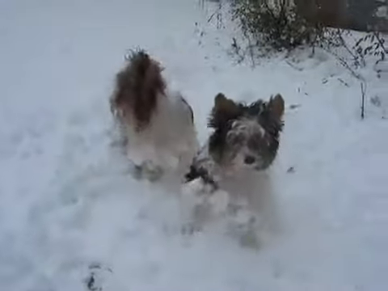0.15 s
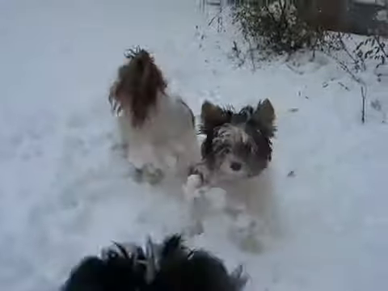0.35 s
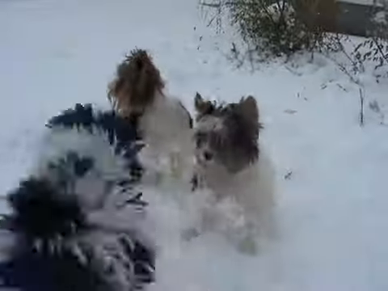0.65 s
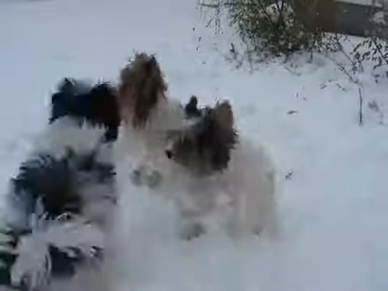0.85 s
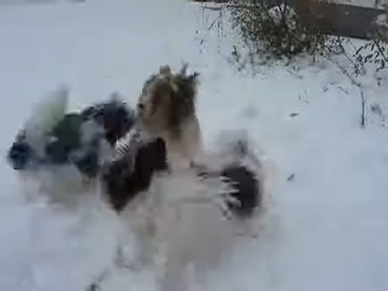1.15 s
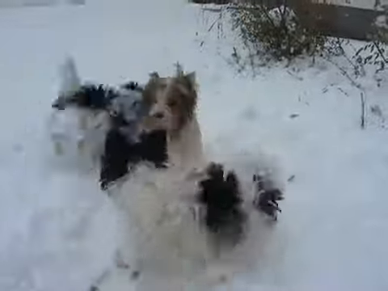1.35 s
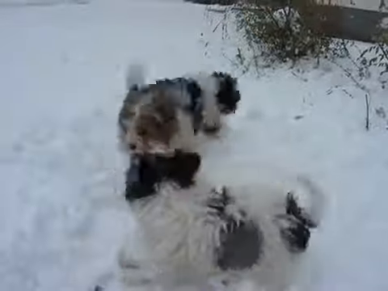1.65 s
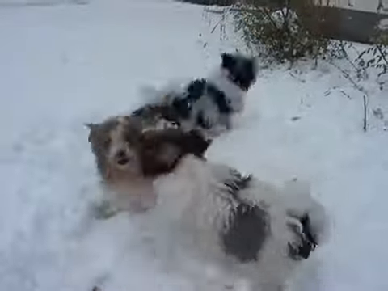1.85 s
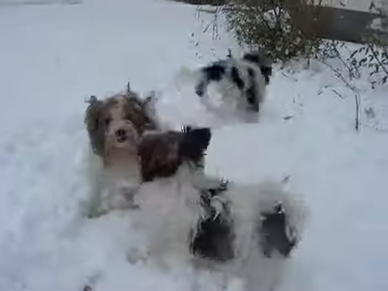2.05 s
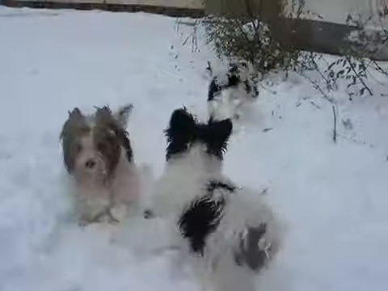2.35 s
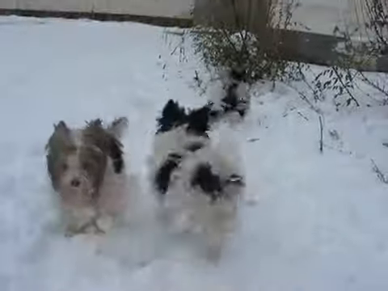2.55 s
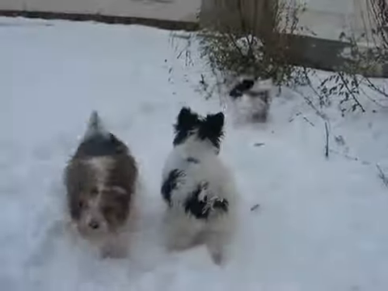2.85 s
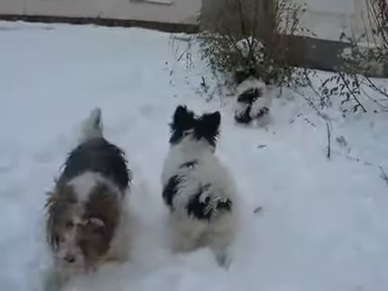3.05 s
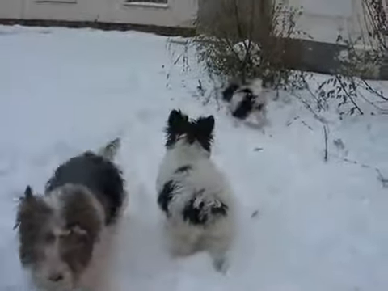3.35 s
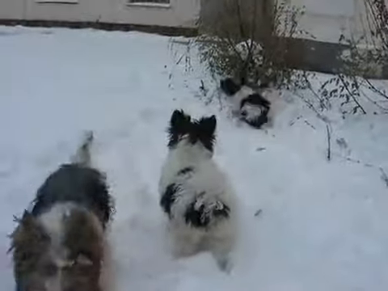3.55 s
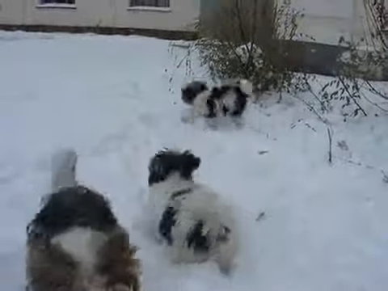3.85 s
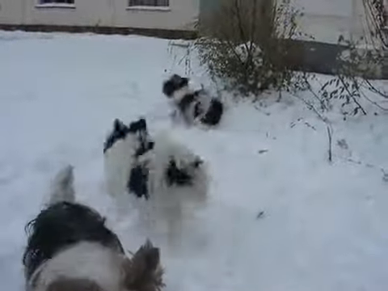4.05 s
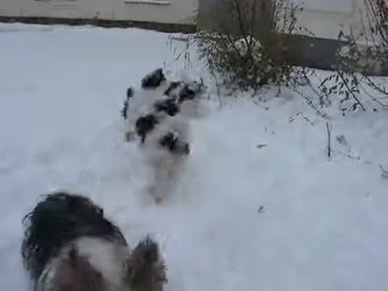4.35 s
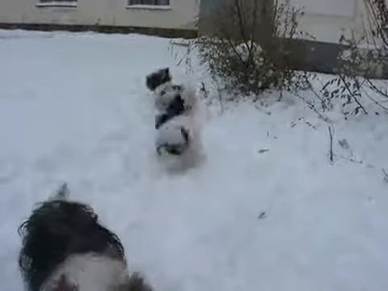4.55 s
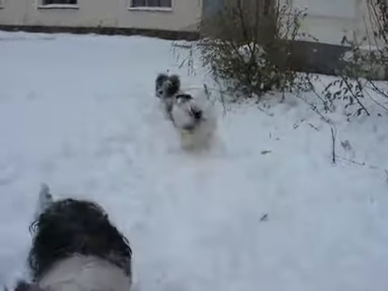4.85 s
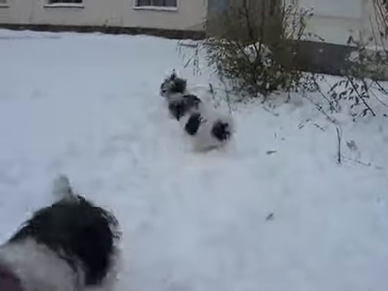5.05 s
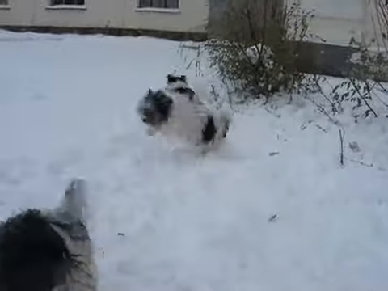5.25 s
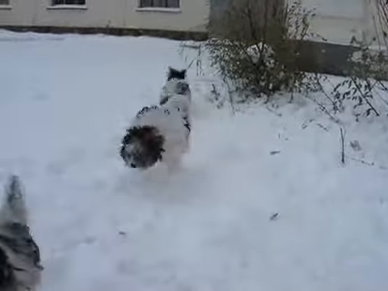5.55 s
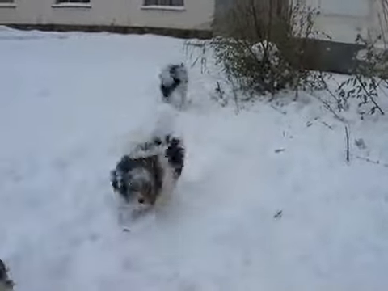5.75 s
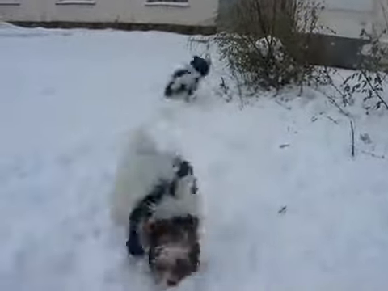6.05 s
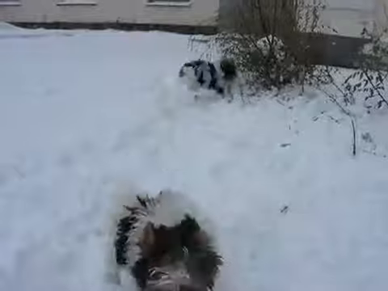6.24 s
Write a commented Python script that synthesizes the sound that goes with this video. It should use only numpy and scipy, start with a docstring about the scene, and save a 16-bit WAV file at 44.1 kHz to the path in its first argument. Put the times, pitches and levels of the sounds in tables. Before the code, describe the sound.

Small puppies whimper softly and give three short high yips, with paws thudding in snow over a steady outdoor hiss.

```python
"""Paws thud and scuff in snow over an outdoor hiss; then small puppies whimper softly and yip three times.
Each call is a harmonic series from the vocal folds, shaped by the resonances of the mouth; irregular
vibration makes it hoarse. The calls return faintly from the house walls around the yard.
A pocket camera with a low sample rate hears it; its gain control ducks after loud yips and creeps back."""
import sys
import numpy as np
from scipy import signal
from scipy.fft import rfft, irfft, next_fast_len
from scipy.io import wavfile
from scipy.ndimage import uniform_filter1d

SR = 44100
rng = np.random.default_rng(int(sys.argv[2]) if len(sys.argv) > 2 else 0)


def store_pcm(level_fs):
    """Save levels as 16-bit WAV."""
    pcm = np.round(np.clip(level_fs, -1, 1) * 32767).astype(np.int16)
    wavfile.write(sys.argv[1], SR, np.atleast_2d(pcm).T)


N = 282725
TIME = np.arange(N) / SR

# spectrum of the outdoor hiss: frequency_hz, relative_density_db
HISS_SPECTRUM = [(24, -50), (40, 17), (43, -25), (91, -14), (268, -13), (364, -7.5), (417, -9.5),
                 (545, -4.5), (770, -6.5), (881, -3), (1200, -8.5), (1270, -10.5), (1940, -14.5),
                 (3440, -19.5), (3940, -24.5), (5120, -56), (8670, -120)]
# a distant rush that swells and sinks: time_s, level_db
RUSH_ENVELOPE = [(0, -55.5), (1.4, -51), (3.3, -57), (4.1, -48), (4.45, -41.5), (4.7, -45.5), (4.9, -54.5),
                 (5.4, -52), (5.9, -47.5), (6.4, -50)]
# spectrum of that rush: frequency_hz, relative_density_db
RUSH_SPECTRUM = [(250, -21.5), (550, -16), (850, -8), (1100, -14), (1800, -36)]
# snow scuffed up: middle_s, level_db, length_s, centre_hz, width_octaves
SNOW_SCUFFS = [(0.19, -53, 0.16, 2780, 0.33), (0.703, -45.5, 0.094, 776, 2.9),
               (1.009, -36, 0.017, 1840, 0.58), (1.007, -33, 0.02, 740, 1.8), (2.65, -53, 0.25, 2800, 0.23),
               (5.891, -46, 0.084, 1993, 1.1), (6.307, -49.5, 0.31, 2740, 0.38)]
# paws landing in snow: start_s, peak_db, centre_hz, t60_s
PAW_IMPACTS = [(.208, -24, 363, 0.052), (0.259, -29, 597, 0.063), (0.388, -23.5, 513, 0.043),
               (0.591, -21, 370, 0.028), (.672, -31, 423, 0.085), (1.194, -32.5, 103, 0.069),
               (1.211, -33, 115, 0.026), (5.686, -30, 496, 0.051), (6.100, -22, 660, 0.022),
               (6.274, -25.5, 436, 0.041)]
# frequency response of the yard's echo: frequency_hz, gain_db
YARD_RESPONSE = [(500, -8.5), (1250, -2.5), (2000, 1), (2500, -3), (3200, 6.5), (4000, -3)]
# vocal tract with the mouth nearly shut: frequency_hz, gain_db
SHUT_TRACT = [(250, -15.5), (460, -1), (750, 0), (1050, -0.5), (1450, -12), (1800, -6.5), (2200, -4.5),
              (2800, -13.5), (3500, -10.5), (5000, -19.5)]
# vocal tract with the mouth wide open: frequency_hz, gain_db
OPEN_TRACT = [(450, -53.5), (650, -18.5), (820, 2), (1050, 3.5), (1300, 3), (1600, 3.5), (1900, 3),
              (2300, 5), (2700, -1.5), (3000, -8.5), (3500, -4.5), (4200, -24.5), (5500, -65.5)]
# faint whines: start_s, length_s, pitch_hz, level_db
WHINE_NOTES = [(3.518, .11, 891, -45.5), (5.69, 0.0766, 860, -39.5)]
# one contour per whimper: time_s, pitch_hz, level_db
WHIMPER_CONTOURS = [
    [(1.540, 842, -36), (1.549, 781, -28), (1.560, 690, -26.5), (1.568, 842, -24), (1.578, 589, -35),
     (1.614, 568, -40), (1.621, 686, -25.5), (1.632, 763, -23.5), (1.648, 636, -37), (1.665, 735, -31)],
    [(2.535, 693, -32.5), (2.544, 748, -23), (2.548, 940, -19.5), (2.560, 989, -20.5), (2.569, 1052, -27)],
    [(2.750, 908, -22), (2.778, 902, -24), (2.795, 842, -19.5), (2.810, 733, -19.5), (2.824, 696, -28),
     (2.829, 469, -29.5), (2.862, 481, -31.5)],
]
# one timbre per whimper; tilt is the slope of the harmonic series:
# first_tilt_db_per_octave, middle_tilt_db_per_octave, last_tilt_db_per_octave, roughness, treble_db
WHIMPER_TIMBRES = [(4, -3, -9, 0.2, -23), (7, -6, -22, 0.16, -16), (-12.5, -3.5, -4, 0.18, 5.5)]
# stretches where a yip may turn hoarse: start_s, end_s, final_added_roughness
VOICE_CRACKS = [(1.889, 1.974, 0.84), (1.979, 1.987, 0.6), (3.984, 4.07, 0), (5.02, 5.045, 0.75),
                (5.041, 5.079, 1.26), (5.087, 5.104, 1.2)]
# one arch per yip, the first breaking upward twice: time_s, pitch_hz
YIP_CONTOURS = [
    [(1.874, 917.5), (1.895, 1109), (1.918, 1253), (1.932, 1210), (1.936, 1532), (1.950, 1095),
     (1.953, 1718), (1.966, 1303), (1.993, 1159), (2.020, 980)],
    [(3.928, 1070), (3.942, 1325), (3.956, 1403), (3.966, 1360), (3.974, 1230), (3.982, 964), (4.000, 961),
     (4.035, 906), (4.070, 924)],
    [(4.995, 872.6), (5.012, 1174), (5.030, 1249), (5.046, 1264), (5.055, 1171), (5.079, 1060),
     (5.087, 845), (5.110, 804)],
]
# loud yips: start_s, attack_s, hold_s, release_s, level_db,
# first_tilt_db_per_octave, last_tilt_db_per_octave, echo_send_db, treble_db
YIP_NOTES = [(1.871, 0.017, 0.1, 0.036, -3.5, 3.5, -14, -22.5, -0.5),
             (3.926, 0.021, 0.067, 0.061, -11, 3, -10.5, -26.5, 15),
             (4.994, 0.019, 0.072, 0.026, -8.5, -7, -0.5, -19, 0)]


def from_db(db):
    """Decibel law: amplitude grows tenfold every 20 dB."""
    return 10 ** (np.asarray(db) / 20)


def unit_rms(x):
    """Normalisation to a mean square of one."""
    return x / np.sqrt(np.mean(x ** 2) + 1e-20)


def butterworth(x, order, hz, kind="low"):
    """Causal filtering with a maximally flat passband."""
    return signal.sosfilt(signal.butter(order, hz, kind, fs=SR, output="sos"), x)


def coloured(x, spectrum):
    """Spectral shaping by a (frequency_hz, gain_db) curve, falling 20 dB per octave past its ends."""
    hz, db = np.transpose(spectrum)
    size = next_fast_len(len(x) + 2048)
    octave = np.log2(np.maximum(np.arange(size // 2 + 1) * SR / size, 1))
    beyond = np.abs(octave - np.clip(octave, np.log2(hz[0]), np.log2(hz[-1])))
    gain = from_db(np.interp(octave, np.log2(hz), db) - 20 * beyond)
    return irfft(rfft(x, size) * gain, size)[:len(x)]


def noise(spectrum, size=N):
    """Filtered white noise takes on the filter's spectrum; unit power."""
    return unit_rms(coloured(rng.standard_normal(size), spectrum))


def wobble(rate_hz, size):
    """Random modulation: low-passed noise of unit power."""
    return unit_rms(butterworth(rng.standard_normal(size + 4096), 2, rate_hz)[4096:])


def running_power(x, size):
    """Short-time mean square under a triangular window."""
    return np.maximum(uniform_filter1d(uniform_filter1d(x ** 2, size), size), 1e-12)


def lagged(x, time_constant_s):
    """Exponential relaxation through a one-pole filter."""
    pole = np.exp(-1 / (time_constant_s * SR))
    return signal.lfilter([1 - pole], [1, -pole], x)


def during(start_s, end_s):
    """The sampling instants of an interval."""
    return TIME[(TIME >= start_s) & (TIME < end_s)]


def outdoor_air(hiss_db=-41, flutter_db=1.0):
    """Amplitude-modulated noise: a nearly even hiss with a far rush swelling inside it."""
    hiss = from_db(hiss_db + flutter_db * wobble(14, N)) * noise(HISS_SPECTRUM)
    rush = from_db(np.interp(TIME, *np.transpose(RUSH_ENVELOPE))) * noise(RUSH_SPECTRUM)
    return hiss + rush


def scuffs(grain_db=3.0):
    """Granular friction: loose snow brushed aside gives short puffs of band-limited noise."""
    out = np.zeros(N)
    grains = rng.standard_normal(N) * from_db(grain_db * wobble(200, N))
    for middle_s, level_db, length_s, centre_hz, octaves in SNOW_SCUFFS:
        band_hz = centre_hz * 2 ** (np.array([-.5, .5]) * octaves)
        stroke = np.exp(-np.minimum(2 * np.abs(TIME - middle_s) / length_s, 2) ** 6)
        out += from_db(level_db) * stroke * unit_rms(butterworth(grains, 2, band_hz, "band"))
    return out


def paws():
    """Inelastic impact: each landing packs the snow in a dull, heavily damped burst."""
    out, t = np.zeros(N + SR), TIME[:SR // 8]
    for start_s, peak_db, centre_hz, t60_s in PAW_IMPACTS:
        crush = rng.standard_normal(len(t)) * from_db(-60 * t / t60_s)
        crush[0] += 12   # the first contact
        thud = butterworth(crush, 2, [centre_hz / 2, centre_hz * 2], "band")
        at = int(start_s * SR)
        out[at:at + len(t)] += from_db(peak_db) * thud / np.abs(thud).max()
    return out[:N]


def yard_echo(x, build_s=0.022, t60_s=2.2, farthest_s=.9, wall_delay_s=0.31, wall_spread_s=0.019,
              wall_db=-8.5, ring_hz=1279, ring_width_hz=60, ring_db=0.5):
    """Reverberation by convolution: snow absorbs the near reflections; one wall's thin echo stands out."""
    t = TIME[:SR + SR // 5]
    scatter = rng.standard_normal(len(t))
    wash = scatter * np.minimum(t / build_s, 1) * from_db(-60 * t / t60_s) * (t < farthest_s)
    wall = butterworth(scatter[::-1], 2, 1700, "high")
    wall *= np.exp(-((t - wall_delay_s) / wall_spread_s) ** 2)
    echoes = (unit_rms(wash) + from_db(wall_db) * unit_rms(wall)) / np.sqrt(len(t))
    ring = signal.lfilter(*signal.iirpeak(ring_hz, ring_hz / ring_width_hz, fs=SR), echoes)
    impulse_response = echoes + from_db(ring_db) * ring   # the echo rings on near one pitch
    return coloured(signal.fftconvolve(x, impulse_response)[:N], YARD_RESPONSE)


def vocal_folds(pitch_hz, tilt, rough, size, rattle_hz=450, hoarse_loss_db=7.5):
    """A harmonic oscillator; when rough, jitter unsettles it and a second vibration adds sidebands."""
    wavering_hz = pitch_hz * (1 + 0.04 * rough ** 2 * wobble(130, size))
    phase = 2 * np.pi * np.cumsum(wavering_hz) / SR
    rattle = np.sin(2 * np.pi * np.cumsum(rattle_hz * (1 + 0.33 * wobble(48.9, size))) / SR)
    phase += rough * (.45 * wobble(260, size) + .55 * rattle)   # uneven cycle lengths
    folds = np.zeros(size)
    for k in range(1, 6):
        harmonic_db = tilt * np.log2(k) - hoarse_loss_db * rough * max(k - 2, 0)
        folds += from_db(harmonic_db) * np.sin(k * phase + np.pi * k * k / 4)
    shimmer = 0.18 * wobble(400, size)
    return folds * (1 + rough * (0.64 * rattle + shimmer))


def call(t, pitch_hz, level_db, tilt, rough, tract, breath_db=-28, fade_s=0.0014):
    """Source-filter principle: the vocal tract colours both the folds' tone and the breath noise."""
    size = len(t)
    voice = coloured(vocal_folds(pitch_hz, tilt, np.clip(rough, 0, 1.5), size), tract)
    voice /= np.sqrt(running_power(voice, size=90))
    breath = from_db(breath_db) * noise(tract, size)
    gate = np.clip(np.minimum(t - t[0], t[-1] - t) / fade_s, 0, 1)
    out, at = np.zeros(N), np.searchsorted(TIME, t[0])
    out[at:at + size] = (voice + breath) * gate * from_db(level_db)
    return out


def whine(start_s, length_s, pitch_hz, level_db, swell_db=12):
    """Steep spectral tilt leaves a nearly pure tone, which swells and fades on one pitch."""
    t = during(start_s, start_s + length_s)
    envelope_db = level_db + swell_db * (np.sin(np.pi * (t - start_s) / length_s) - 1)
    return call(t, pitch_hz, envelope_db, tilt=-21, rough=.1, tract=SHUT_TRACT)


def whimper(contour, first_tilt, middle_tilt, last_tilt, rough, treble_db, margin_s=.0033):
    """Soft phonation through a nearly shut mouth; directivity dulls it when the puppy faces away."""
    time_s, pitch_hz, level_db = np.transpose(sorted(contour))
    t = during(time_s[0] - margin_s, time_s[-1] + margin_s)
    tilt = np.interp(t, [t[0], t.mean(), t[-1]], [first_tilt, middle_tilt, last_tilt])
    tract = [(hz, db + np.interp(hz, [1500, 2200], [0, treble_db])) for hz, db in SHUT_TRACT]
    return call(t, np.interp(t, time_s, pitch_hz), np.interp(t, time_s, level_db), tilt, rough, tract)


def hoarseness(t, clear_roughness=.04, onset_share=0.637, edge_s=0.0047):
    """Instability of hard-pressed folds: roughness jumps up and grows until the voice catches again."""
    rough = clear_roughness
    for start_s, end_s, final in VOICE_CRACKS:
        inside = np.clip(.5 + np.minimum(t - start_s, end_s - t) / edge_s, 0, 1)
        rough = rough + final * inside * np.interp(t, [start_s, end_s], [onset_share, 1])
    return rough


def yip(start_s, attack_s, hold_s, release_s, level_db, first_tilt, last_tilt, treble_db, contour,
        rise_db=19, sag_db=3, fall_db=14.5):
    """Pressed phonation: one push of air through an open mouth, whose treble beams forward."""
    corners_s = start_s + np.cumsum([0, attack_s, hold_s, release_s])
    t = during(start_s, corners_s[-1])
    effort_db = np.interp(t, corners_s, [-rise_db, 0, -sag_db, -sag_db - fall_db])
    pitch_hz = np.interp(t, *np.transpose(sorted(contour)))
    rough = hoarseness(t)
    tilt = np.linspace(first_tilt, last_tilt, len(t))
    tilt += 7.5 * np.log2(pitch_hz / 1200) + 5.5 * rough   # a higher or hoarser voice is brighter
    tract = [(hz, db + np.interp(hz, [3200, 4100], [0, treble_db])) for hz, db in OPEN_TRACT]
    tremble_db = wobble(70, len(t)) * np.linspace(0, 2, len(t))   # grows as the air runs out
    return call(t, pitch_hz, level_db + effort_db + tremble_db, tilt, rough, tract)


def scene(soft_echo_send_db=-19):
    """Superposition of the puppies' calls, their echoes, their paws and the outdoor air."""
    voices = sum(whimper(contour, *timbre) for contour, timbre in zip(WHIMPER_CONTOURS, WHIMPER_TIMBRES))
    voices += sum(whine(*note) for note in WHINE_NOTES)
    to_walls = from_db(soft_echo_send_db) * voices
    for (*shape, echo_send_db, treble_db), contour in zip(YIP_NOTES, YIP_CONTOURS):
        direct = yip(*shape, treble_db, contour)
        voices += direct
        to_walls += from_db(echo_send_db) * direct
    return (voices + yard_echo(to_walls) + paws() + scuffs() + outdoor_air())[None]


def gain_control(x, limit_db=-10.5, late_s=0.0077, attack_s=0.0002, overshoot=0.57, settle_s=0.019):
    """Compression: past the limit the gain drops late and abruptly, sinks further, then creeps back."""
    excess_db = np.maximum(10 * np.log10(running_power(x, size=60)) - limit_db, 0)
    leak_db = 17 * TIME   # the held peak drains at a steady rate
    held_db = np.maximum.accumulate(excess_db + leak_db) - leak_db
    held_db = np.interp(TIME - late_s, TIME, held_db)
    gain = from_db(-lagged(held_db, attack_s) - overshoot * lagged(held_db, settle_s))
    bias = 0.14 * np.tanh((1 - gain) / 0.07)   # the bias jumps with the gain
    thump = butterworth(bias, 3, 115, "high")
    return x * gain + thump


def record(dry, saturation=0.71, camera_rate_hz=8000, ceiling=0.74, dc_offset=-.0526):
    """Compression, saturation, aliasing and clipping: the camera's path from microphone to samples."""
    x = gain_control(dry[0])
    x = x / (1 + (x / saturation) ** 8) ** (1 / 8)   # rounds the peaks
    x = butterworth(x, 4, 70, "high")
    x = signal.sosfiltfilt(signal.butter(4, 4050, fs=SR, output="sos"), x)
    samples = signal.resample_poly(x, 4 * camera_rate_hz, SR)[::4]   # the top harmonics fold down
    x = signal.resample_poly(samples, SR, camera_rate_hz)[:N]
    x = signal.sosfiltfilt(signal.butter(10, 4600, fs=SR, output="sos"), x)
    x = np.clip(x, -ceiling, ceiling)   # only the hardest yip crackles here
    return butterworth(x, 12, 15000)[None] + dc_offset


dry = scene()
out = record(dry)
store_pcm(out)
```